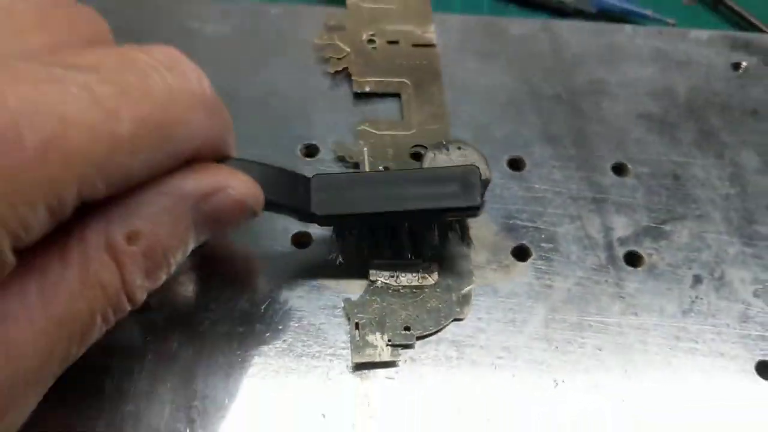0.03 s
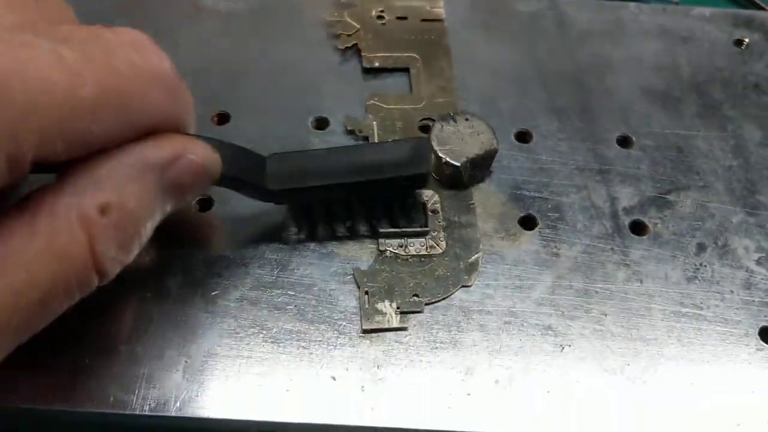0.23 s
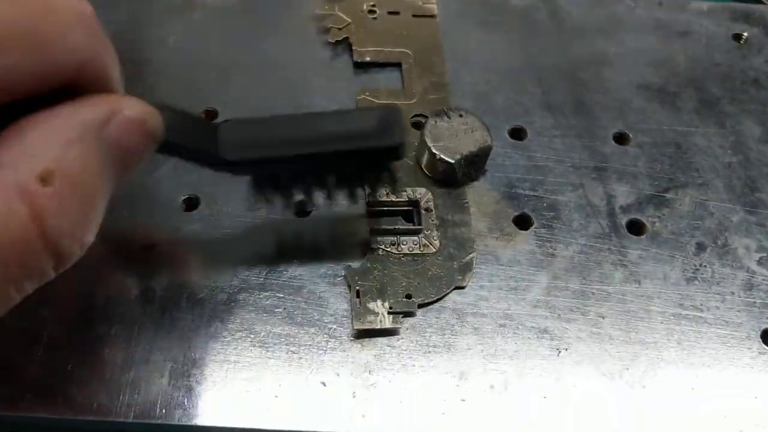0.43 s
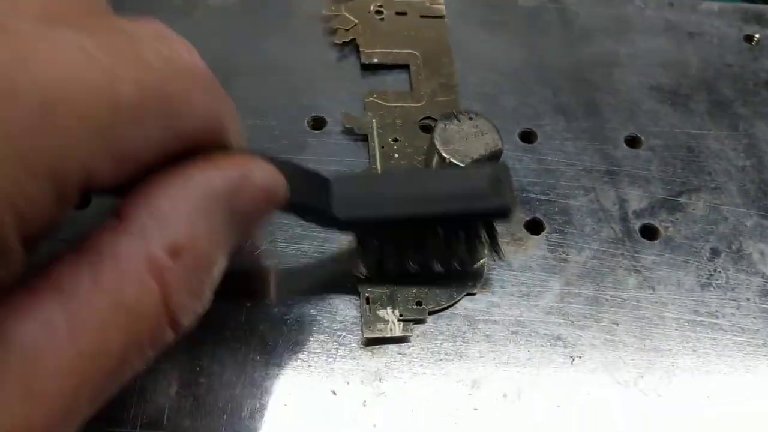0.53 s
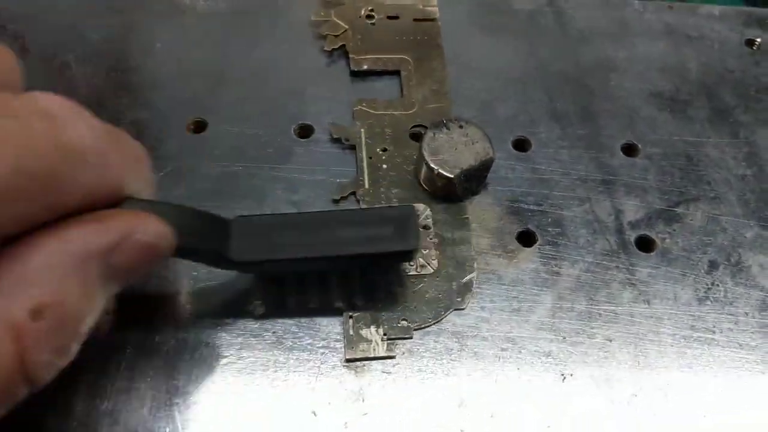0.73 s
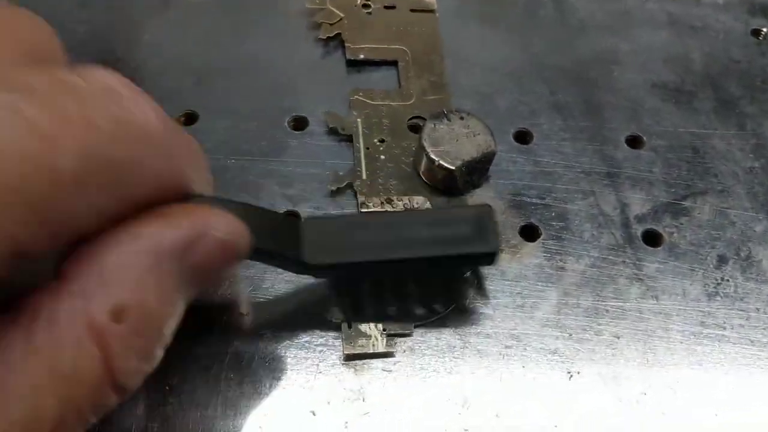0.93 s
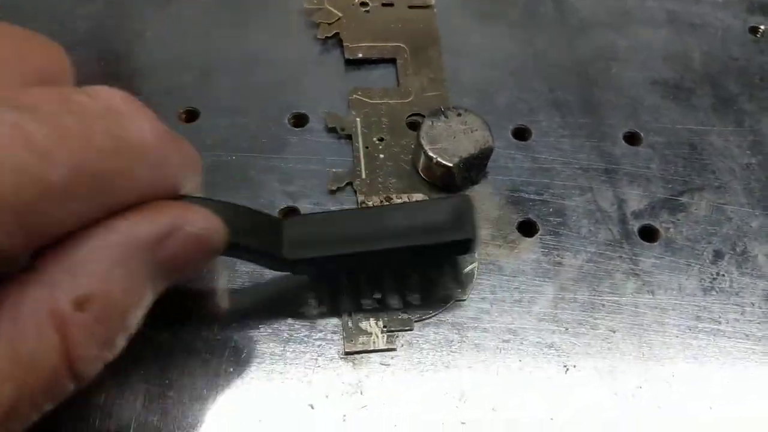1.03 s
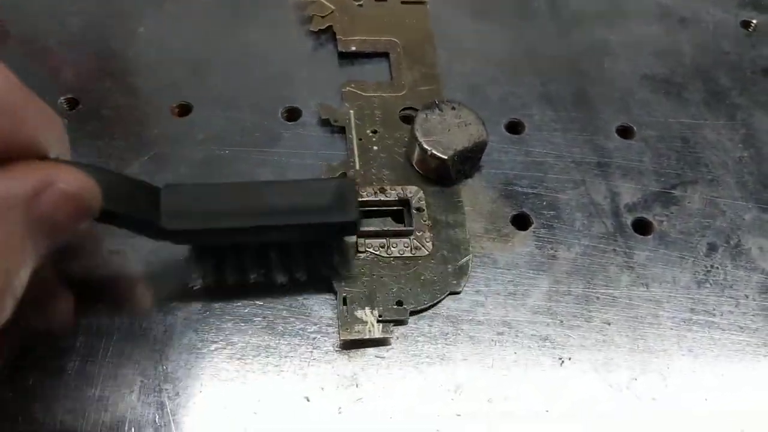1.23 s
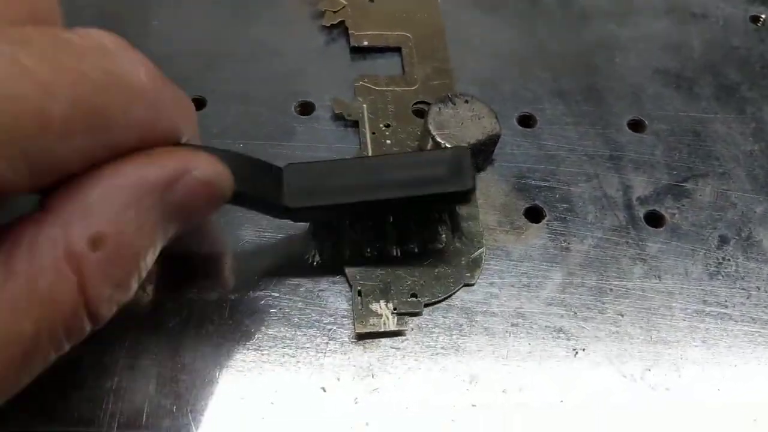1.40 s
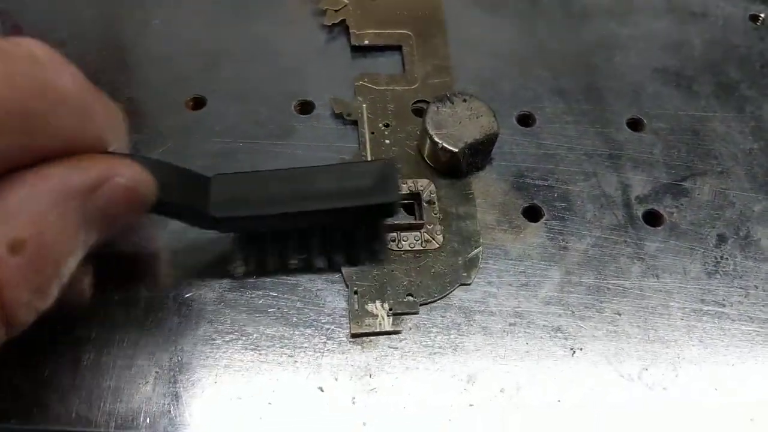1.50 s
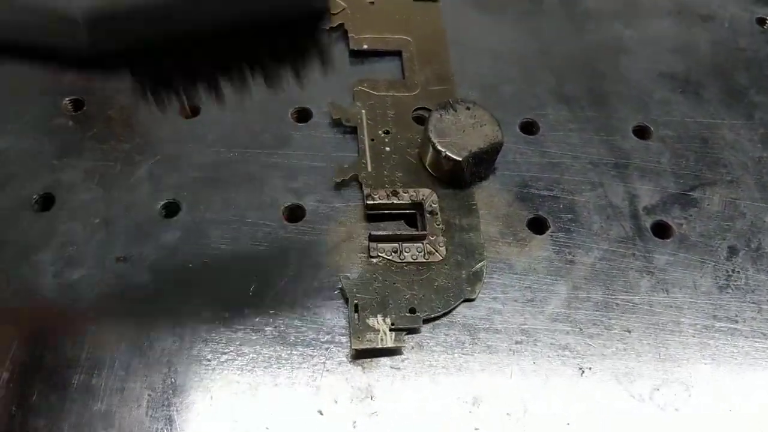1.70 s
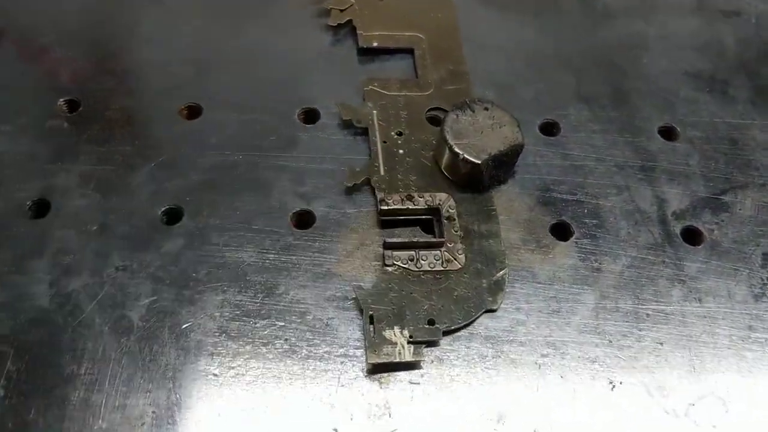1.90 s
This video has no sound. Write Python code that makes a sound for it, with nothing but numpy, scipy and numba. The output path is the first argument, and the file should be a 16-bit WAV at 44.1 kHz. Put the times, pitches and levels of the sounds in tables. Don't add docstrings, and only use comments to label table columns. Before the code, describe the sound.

Close, dry, bright scratching of stiff bristles on metal, four uneven strokes with sharp flicks and soft bench thumps; the brush springs off with a short ring, leaving low room hush.

```python
import sys
import numpy as np
from scipy import signal
from scipy.fft import rfft, irfft
from scipy.io import wavfile
from scipy.ndimage import uniform_filter1d
from numba import njit

SR = 44100
rng = np.random.default_rng(int(sys.argv[2]) if len(sys.argv) > 2 else 0)


def master(y):
    cut = np.clip(np.atleast_2d(y).T, -1, 1)
    pcm = np.round(cut * 32767)
    wavfile.write(sys.argv[1], SR, pcm.astype(np.int16))


def invert_db(x):
    u = np.asarray(x, float) / 20
    return 10 ** u


N = 85995

# frequency in Hz, level in dB.
HUSH_SPECTRUM = [(35, -45), (60, 4.5), (403, -2.5), (627, -8.5), (869, -10), (1790, -13.5), (4740, -15.5),
                 (5580, -15), (15500, -24.5)]
# frequency in Hz, level in dB, T60 in seconds.
BENCH_MODES = [(74.4, 0, 0.13), (96, -12.5, 1), (147.2, -6.5, 0.24), (167.9, 0, 0.16), (199.5, -9, 0.27),
               (345.5, -19, 0.75), (376.5, -10.5, 0.13), (535.6, -20.5, 0.21), (590, -22, 0.061)]
# start in seconds, strength in dB, sharpness in dB.
HAND_BUMPS = [(0.103, -61, -22), (0.31, -58.5, 1), (0.446, -51.5, 3), (0.698, -52, -9.5),
              (0.918, -57, -0.5), (1.082, -64, -15), (1.33, -55.5, 1.5), (1.386, -60.5, 11),
              (1.565, -52, -15), (1.642, -43.5, -2), (1.745, -61.5, 9)]
# time in seconds, bristle pressure in dB, share into the brass in dB,
# share into the plate in dB.
STROKES = [
    [(0.05, -90, -24, 9), (0.072, -66.5, -11, 11), (0.176, -64.5, -13, -2), (0.21, -51, -16, -13),
     (0.25, -45, 1, 1), (0.31, -44, 3.5, 0.5), (0.358, -41.5, 1.5, 0), (0.454, -46.5, -1, 0.5),
     (0.56, -74, -8, 8)],
    [(0.62, -79, -3, 4), (0.632, -63, -19, -36), (0.64, -52.5, -45, -4), (0.714, -47.5, 6.5, 4),
     (0.794, -37, -1.5, 1), (0.898, -44.5, 1, 5), (1.0, -77, -2, 18)],
    [(1.0, -83, 18, 11), (1.028, -44, -12.5, -1.5), (1.09, -56, 0.5, 8), (1.122, -44, 3, -2),
     (1.206, -39, 1, -0.5), (1.302, -46, -22, -4), (1.34, -50.5, -6, 5)],
    [(1.34, -84, -23, -18), (1.36, -49, -7, 1.5), (1.5, -56, -3, 2), (1.51, -42.5, -5, -26),
     (1.526, -45, -1.5, -4.5), (1.624, -36, -3, 6.5), (1.78, -82.5, 8, 8)],
]
# time in seconds, place in brush widths.
BRUSH_PATH = [(.06, 0.41), (.25, 0.01), (.5, 0.22), (.68, 0.29), (.8, 0.48), (.97, 0.7), (1.05, 0.36),
              (1.2, 0.31), (1.3, 0.27), (1.399, 0.22), (1.6, 0.5)]
PLATE_HZ = [979, 1381, 1423, 1466, 1515, 1666, 1743, 1929, 2317, 2593, 3092, 3135, 3228, 3980]
# level in dB, free T60 in seconds, offset of nodes along the path in turns.
PLATE_MODES = [(-16.5, 0.62, 0.024), (-15, 0.95, -0.054), (-4, 0.41, -0.092), (-24.5, 0.92, -0.35),
               (-24, 0.13, 0.14), (-20, 0.12, 0.029), (-34, 1.4, -0.28), (-17, 0.58, 0.078),
               (-8.5, 0.61, 0.1), (-20, 0.2, 0.0074), (-25, 0.084, 0.15), (-12.5, 1.74, -0.062),
               (-13.5, 0.063, -0.1), (-2.5, 0.34, -0.028)]
UPPER_PLATE_HZ = [3864, 4170, 5492, 5744, 6665, 7980, 8390, 8600, 8980, 9320, 9760, 10400, 10620, 12050]
# level in dB, free T60 in seconds, offset of nodes in turns.
UPPER_PLATE_MODES = [(8, 0.23, 1), (-3, 0.52, 0.82), (-9, 0.79, 0.86), (14, 0.58, 0.72), (2, 0.42, 0.56),
                     (9, 0.69, 0.56), (-4, 0.37, 0.43), (-23, 0.26, 0.65), (-2.5, 0.58, 0.84),
                     (4, 0.32, 0.88), (8, 0.36, 0.6), (5.5, 0.19, 1), (-7, 0.69, 0.6), (-3, .5, .75)]
# frequency in Hz, level in dB, T60 in seconds,
# offset of nodes in turns, share of the flexing from 0 to 1.
BRASS_MODES = [(3144, -3, 0.047, 0.99, 0.38), (3864, -5, 0.053, 0.32, 0.57), (4100, -11, 0.02, 0.62, 0.6),
               (4675, -3, 0.04, 0.18, 1), (4781, 1.5, 0.037, 0.019, 0.94), (4896, 0, 0.015, 0.61, .9),
               (5530, -10, 0.027, 1, 0.4), (5740, -18.5, 0.026, 0.086, 0.25), (6550, -11, 0.028, .4, .1),
               (6810, -5, 0.018, 0.41, 0), (7270, -11, 0.027, .4, 0), (7520, -5, 0.013, 0.26, 0.16),
               (8420, -33, 0.024, 0.87, .1)]
# time in seconds, pitch of its main rattle in Hz.
BRASS_FLEX = [(0.06, 4660), (0.226, 4690), (0.448, 4540), (0.696, 4748), (1.78, 4644)]
# frequency in Hz, level in dB.
SCRATCH_SPECTRUM = [(300, -11), (1200, -60), (1500, -14), (1850, -11.5), (3500, -14), (7300, -2),
                    (10500, -5.5), (15500, -3.5)]
# frequency in Hz, T60 in seconds.
SCRATCH_DECAY = [(1000, 0.074), (5000, 0.017), (10000, 0.045), (16000, 0.0091)]
# frequency in Hz, level in dB.
FLICK_SPECTRUM = [(300, -53), (3000, -28), (6000, -12), (15500, -10)]
# start in seconds, strength in dB, share into the metal in dB,
# twang frequency in Hz.
FLICKS = [(0.0673, -48.5, -5, 7000), (0.0966, -48, 7.5, 7650), (0.1058, -47, 8, 8240),
          (0.1316, -43, 3, 8100), (0.1454, -51.5, 7, 8970), (0.1755, -52.5, 12.5, 6000),
          (0.1846, -49.5, 6, 7270), (0.2056, -30, -1.5, 7160), (0.2394, -56, -36, 6700),
          (0.3085, -31, -25, 6940), (0.4165, -28.5, 0, 14700), (0.6322, -42.5, 2.5, 6980),
          (0.6438, -39, -3.5, 9840), (0.6569, -40, 7, 7870), (0.698, -46, 12.5, 7250),
          (0.7069, -32.5, 10, 9860), (0.7267, -37, 9, 7600), (0.7876, -29, -8, 7500),
          (1.025, -56, -23, 14650), (1.04, -40, 9, 12500), (1.1188, -32, -28, 9760), (1.1391, -31, 6, 7400),
          (1.2454, -28.5, -5, 12800), (1.2555, -29.5, 6.5, 9540), (1.2767, -32.5, -10, 11300),
          (1.2921, -28.5, -5, 11200), (1.299, -37.5, -4, 14800), (1.316, -36.5, -2, 11300),
          (1.325, -43, 3, 7500), (1.355, -36.5, -33, 6650), (1.364, -32.5, -10, 5770),
          (1.369, -39, -8, 9500), (1.387, -35, -26, 6600), (1.417, -35.5, 2.5, 6560),
          (1.4508, -37, -18, 7060), (1.46, -37, -30, 14800), (1.4727, -30, -2.5, 7100),
          (1.505, -45, -18, 7000), (1.5111, -19, -7.5, 10000), (1.5123, -27, -3, 7000),
          (1.563, -34.5, 20.5, 9300), (1.7455, -61, 14, 6800)]

PATCHES = 14
LIFT_S = 1.665


def evened(x):
    return x / np.sqrt(np.mean(x ** 2) + 1e-30)


def unit(x):
    return x / np.sqrt(np.sum(x ** 2) + 1e-30)


def read(points, hz):
    f, value = np.transpose(points)
    return np.interp(np.log(hz + 1), np.log(f + 1), value)


def coloured(x, points):
    gain = invert_db(read(points, np.fft.rfftfreq(len(x), 1 / SR)))
    return irfft(rfft(x) * gain, len(x))


def add(mix, s, sound):
    part = mix[round(s * SR):][:len(sound)]
    part += sound[:len(part)]


@njit
def swing(drive, turn, keep):
    out, state = np.zeros(len(drive)), 0j
    for i in range(len(drive)):
        state = state * turn * keep[i] + drive[i]
        out[i] = state.imag
    return out


def ring(drive, hz, t60, keep):
    free = invert_db(-60 / (abs(t60) + 0.00042) / SR)
    norm = np.sqrt(2 * (1 - (free * abs(keep).min()) ** 2))
    return norm * swing(drive, free * np.exp(2j * np.pi * hz / SR), keep)


def room_hush():
    return invert_db(-61.5) * evened(coloured(rng.standard_normal(N), HUSH_SPECTRUM))


def wall_echo(x):
    t = np.arange(SR // 2) / SR
    tail = unit(rng.standard_normal(len(t)) * invert_db(-60 * t / 0.14) * (t > .006))
    return invert_db(-13) * signal.fftconvolve(x, tail)[:N]


def stroke_control(axis):
    rows = np.concatenate([np.array(stroke) for stroke in STROKES])
    outside = -99 * (axis == 1)
    return np.interp(np.arange(N) / SR, rows[:, 0], rows[:, axis], left=outside, right=outside)


def bench_hum():
    level = invert_db(-64.5 + 0.27 * (stroke_control(axis=1) + 60.5))
    drag = level * rng.standard_normal((len(BENCH_MODES), N))
    steady = np.ones(N, complex)
    return sum(invert_db(db) * ring(row, hz, t60, steady) for row, (hz, db, t60) in zip(drag, BENCH_MODES))


def bench_bumps():
    out, t = np.zeros(N), np.arange(16000) / SR
    hz, mode_db, t60 = np.transpose(BENCH_MODES[2:])[:, :, None]
    rise_s, knock_t60 = .028, 0.14
    for s, db, sharp_db in HAND_BUMPS:
        phase = rng.random(hz.shape)
        tones = invert_db(mode_db - 60 * t / np.abs(t60)) * np.sin(2 * np.pi * (hz * t + phase))
        boom = tones.sum(0) * np.minimum(t / rise_s, 1)
        dull = signal.lfilter([.25], [1, -.75], rng.standard_normal(len(t)))
        knock = unit(dull * invert_db(-60 * t / knock_t60))
        add(out, s, invert_db(db + 12) * boom + invert_db(db + sharp_db + 28) * knock)
    return out


def modes(drive, hzs, table, spot, place_db):
    damp_db_per_s, patch_spread_db, flex_rest_hz = 101, 2, 4760
    out, at, t = np.zeros(N), np.flatnonzero(drive), np.arange(N) / SR
    place = np.interp(at / SR, *np.transpose(BRUSH_PATH))
    damping = invert_db(-damp_db_per_s / SR * (np.arange(N) < LIFT_S * SR))
    flex = np.interp(t, *np.transpose(BRASS_FLEX)) / flex_rest_hz - 1
    for hz, (db, t60, offset, *share) in zip(hzs, table):
        luck = rng.standard_normal((PATCHES, 2))[spot[at]]
        nodes = np.sin(2 * np.pi * (place + offset))
        gain = invert_db(db + place_db * nodes + patch_spread_db * luck[:, 0])
        fed = np.zeros(N)
        fed[at] = drive[at] * gain * np.sign(luck[:, 1])
        bend = np.exp(2j * np.pi * hz * sum(share) * flex / SR)
        out += ring(fed, hz, t60, damping * bend)
    radiation = signal.butter(2, .8 * min(hzs), "high", fs=SR, output="sos")
    return signal.sosfilt(radiation, out)


def plate(drive, spot):
    return invert_db(-9.5) * modes(drive, PLATE_HZ, PLATE_MODES, spot, place_db=7)


def upper_plate(drive, spot):
    drive = invert_db(-6) * drive
    add(drive, LIFT_S - .02, invert_db(-10) * unit(rng.standard_normal(size=800)))
    return invert_db(-22.5) * modes(drive, UPPER_PLATE_HZ, UPPER_PLATE_MODES, spot, place_db=-3.5)


def brass(drive, spot):
    hzs = [row[0] for row in BRASS_MODES]
    table = [(db, min(t60, .045), *rest) for _, db, t60, *rest in BRASS_MODES]
    return invert_db(-8) * modes(drive, hzs, table, spot, place_db=1.5)


def snap(colour, tick_db, size, tick_t60):
    lump_db, lump_hz = 2, 1500
    hz, t, z = signal.stft(coloured(rng.standard_normal(size), colour), SR, nperseg=128)
    lumps = evened(uniform_filter1d(rng.standard_normal(len(hz)), max(int(lump_hz / hz[1]), 1)))
    decay_db = 60 * t / np.abs(read(SCRATCH_DECAY, hz))[:, None]
    fade = invert_db(lump_db * lumps[:, None] - decay_db)
    rings = signal.istft(z * fade, SR, nperseg=128)[1][:size]
    tick = invert_db(tick_db - 60 * np.arange(size) / SR / tick_t60)
    return unit(rings * (1 + tick))


def flicks():
    air, kicks, t = np.zeros(N), np.zeros(N), np.arange(4096) / SR
    skip_s, twang_db, twang_t60, twang_spread = .007, -1, 0.076, 0.031
    for s, db, share_db, hz in FLICKS:
        tones = hz * (1 + twang_spread * rng.standard_normal((4, 1)))
        twang = unit(np.sin(2 * np.pi * tones * t).sum(0) * invert_db(-60 * t / twang_t60))
        release = snap(FLICK_SPECTRUM, tick_db=0, size=len(t), tick_t60=.016)
        add(air, s, invert_db(db + 13) * (release + invert_db(twang_db) * twang))
        skips = np.bincount((rng.random(6) ** 2 * skip_s * SR).astype(int))
        add(kicks, s, invert_db(db + share_db + 11) * unit(skips))
    thin = signal.butter(4, 3000, "high", fs=SR, output="sos")
    return signal.sosfilt(thin, air), kicks


def slips():
    slips_per_s, spread_db, clump_db, clump_s = 3200, 3.5, 2, .008
    strength = invert_db(spread_db * np.minimum(rng.exponential(1, N), 3))
    size = strength * (rng.random(N) < slips_per_s / SR)
    clumps = evened(uniform_filter1d(rng.standard_normal(N), max(int(clump_s * SR), 2)))
    clicks = size * rng.choice([-1., 1.], N) * invert_db(clump_db * clumps)
    return evened(clicks) * invert_db(stroke_control(axis=1))


def scratch(tips, spot):
    out = np.zeros(N)
    for k in range(PATCHES):
        sound = snap(SCRATCH_SPECTRUM, tick_db=-10, size=4096, tick_t60=0.0093)
        out += signal.oaconvolve(tips * (spot == k), sound)[:N]
    return invert_db(-2.5) * out


def brush():
    tips, spot = slips(), rng.integers(0, PATCHES, N)
    air, kicks = flicks()
    into_brass = tips * invert_db(stroke_control(axis=2)) + kicks
    into_plate = tips * invert_db(stroke_control(axis=3)) + invert_db(1) * kicks
    metal = brass(into_brass, spot) + plate(into_plate, spot) + upper_plate(tips + kicks, spot)
    return air + scratch(tips, spot) + metal


def scene():
    near = brush()
    return (room_hush() + bench_hum() + bench_bumps() + wall_echo(near) + near)[None]


def roll_off(x):
    return signal.sosfilt(signal.butter(12, 16620, fs=SR, output="sos"), x)


def record(dry):
    bass_cut = signal.butter(3, 62, "high", fs=SR, output="sos")
    thin = signal.sosfilt(bass_cut, dry)
    treble_cut = signal.firwin(511, 15760, window=("kaiser", 6), fs=SR)
    finished = signal.oaconvolve(thin, treble_cut[None], "same")
    return roll_off(finished)


dry = scene()
out = record(dry)
master(out)
```